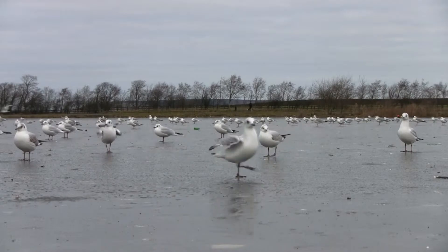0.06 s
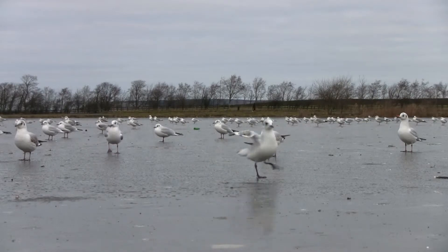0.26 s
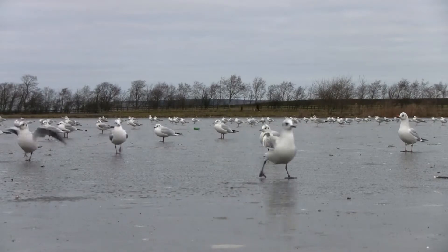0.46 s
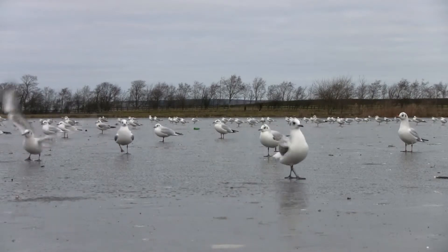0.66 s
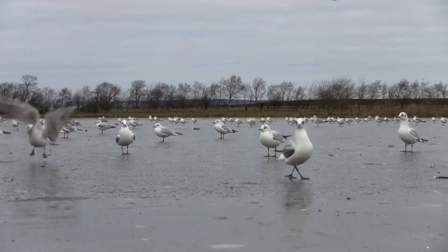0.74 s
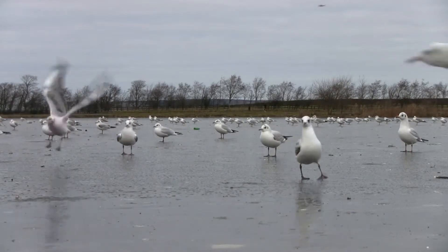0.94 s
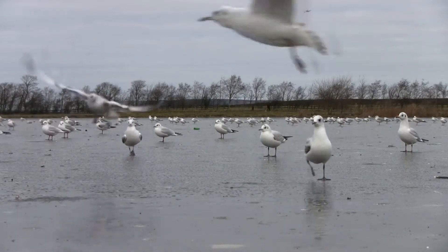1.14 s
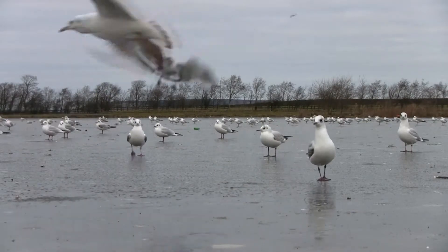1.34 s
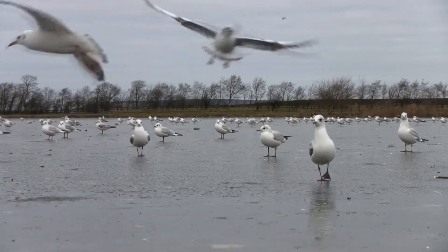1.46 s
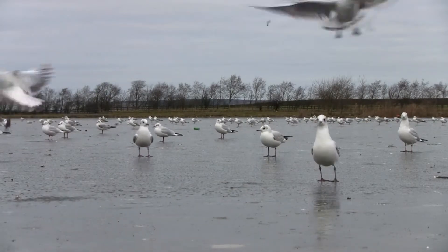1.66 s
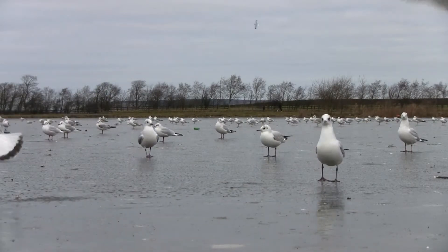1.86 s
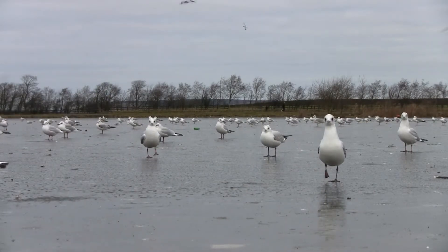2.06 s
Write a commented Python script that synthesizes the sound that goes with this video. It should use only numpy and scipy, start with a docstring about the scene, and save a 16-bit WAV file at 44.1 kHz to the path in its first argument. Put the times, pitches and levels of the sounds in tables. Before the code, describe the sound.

Gulls call close to the microphone on an icy lake: a trilled scream breaking downward, a harsh rattle, then a clear yelp stepping down, with fainter birds behind, distant flock murmur and low wind thumps.

```python
"""On a frozen lake, gulls close to a camera: a trilled scream that breaks downward, a harsh rattle, a clear
yelp that steps down; two more birds behind, and far croaks. Each voice is a stack of syrinx overtones plus
pulsed breath, coloured by a throat; ice and shore echo it. Wind noise and thumps buffet the two microphone
ports, filtered noise makes the murmur of the far flock and air, and a wavering sine makes a faint hum."""
import sys
import numpy as np
from scipy import signal
from scipy.fft import rfft, irfft, next_fast_len
from scipy.io import wavfile
from scipy.ndimage import uniform_filter1d, map_coordinates

SR = 44100
rng = np.random.default_rng(int(sys.argv[2]) if len(sys.argv) > 2 else 0)


def invert_db(x):
    """Field ratio 10**(x/20) for x, a level in decibels (scalar or array-like)."""
    u = np.asarray(x, float) / 20
    return 10 ** u


def wav_record(signal):
    """Record a signal, one row per channel, as 16-bit PCM in the file named by sys.argv[1]."""
    frames = np.transpose(np.atleast_2d(signal))
    bounded = np.clip(frames, -1, 1)
    # unit amplitude maps onto the largest positive 16-bit level
    quanta = np.round(bounded * 32767).astype(np.int16)
    wavfile.write(sys.argv[1], SR, quanta)


N = 92610  # 2.1 s


def unit(x):
    """Brings x to rms 1."""
    return x / np.sqrt(np.mean(x ** 2) + 1e-20)


def along(points, hz):
    """Reads (frequency [Hz], value) points on a log frequency axis."""
    f, v = np.transpose(points)
    return np.interp(np.log(hz + 1), np.log(f + 1), v)


def over_time(points, t):
    """Reads (time [s], value) points at the times t."""
    return np.interp(t, *np.transpose(points))


def wobble(rate, size=N):
    """A smooth random curve, rate knots a second."""
    knots = rng.standard_normal(int(size * rate / SR) + 4)
    return map_coordinates(knots, [np.arange(size) * rate / SR])


def coloured(x, spectrum):
    """x through a spectrum, brought to rms 1."""
    m = next_fast_len(len(x) + 4096)
    gains = invert_db(along(spectrum, np.fft.rfftfreq(m, 1 / SR)))
    return unit(irfft(rfft(x, m) * gains, m)[:len(x)])


def patchy(spectrum, patchy_db):
    """Coloured noise with time-frequency patches of random gain."""
    z = signal.stft(rng.standard_normal(N), nperseg=512)[2]
    field = uniform_filter1d(rng.standard_normal(z.shape), 5, 0)
    field = unit(uniform_filter1d(field, 5, 1))
    noise = signal.istft(z * invert_db(patchy_db * field), nperseg=512)[1][:N]
    return coloured(noise, spectrum)


# wind rumble before its lumps: (time [s], level [dB])
RUMBLE_LEVEL = [(0.0, -48), (0.02, -45.5), (0.1, -51.5), (0.21, -42), (0.34, -59), (0.87, -50),
                (0.92, -41.5), (1.03, -44), (1.51, -32), (1.77, -46), (2.03, -39.5), (2.1, -41.5)]
# rumble spectrum, alike at both ports: (frequency [Hz], relative level [dB])
RUMBLE_SPECTRUM = [(15, -84), (25, -43), (105, -2.5), (171, -1), (358, -10), (560, -16), (700, -39),
                   (910, -59), (1540, -120)]
# wind buffeting before its lumps: (time [s], level [dB])
BUFFET_LEVEL = [(0, -58), (.2, -46), (.34, -62), (.6, -57), (.87, -54.5), (1.0, -45.5), (1.2, -40),
                (1.3, -29.5), (1.48, -30), (1.6, -33), (1.75, -45.5), (1.9, -43), (2.1, -42.5)]
# buffeting spectrum, opposed at the two ports: (frequency [Hz], relative level [dB])
BUFFET_SPECTRUM = [(24, -79), (40, -42), (182, -17), (254, -16), (560, -32.5), (966, -54), (1500, -71),
                   (3300, -120)]
# eddies striking the ports: (time [s], envelope peak of the opposed part [dB])
THUMPS = [(1.125, -25), (1.216, -22.5), (1.26, -20), (1.337, -16.5), (1.384, -19.5), (1.421, -19.5),
          (1.498, -11), (1.621, -22.5), (1.953, -22), (2.023, -24.5)]
THUMP_HZ, THUMP_S, THUMP_MID_DB = 266, 0.0033, -9  # ring, envelope width, share alike at both ports


def wind():
    """Lumpy eddies: a rumble alike at both ports; buffeting and thumps push them mainly in opposition."""
    t = np.arange(N) / SR

    def lumpy(spectrum):
        lumps_db = 2 * wobble(49) + 0.96 * wobble(9.6)
        return coloured(rng.standard_normal(N) * invert_db(lumps_db), spectrum)

    thumps = np.zeros(N)
    for s, db in THUMPS:
        envelope = invert_db(db) * np.exp(-((t - s) / THUMP_S) ** 2)
        thumps += envelope * np.cos(2 * np.pi * THUMP_HZ * (t - s) + rng.normal(0, 0.83))
    mid = invert_db(over_time(RUMBLE_LEVEL, t)) * lumpy(RUMBLE_SPECTRUM) + invert_db(THUMP_MID_DB) * thumps
    side = invert_db(over_time(BUFFET_LEVEL, t)) * lumpy(BUFFET_SPECTRUM) + thumps
    return np.array([mid + side, mid - side])


# spectrum of far flock and air: (frequency [Hz], relative level [dB])
SHORE_SPECTRUM = [(210, -96), (350, -4.5), (574, -10.5), (631, -3), (1030, -5), (2450, -17), (4560, -35),
                  (6900, -34), (15800, -45.5)]
SHORE_DB, SHORE_WIDE_DB = -49, -10  # mean level; side part against mid part


def shore():
    """The murmur of the far flock and the air: patchy noise, wavering slightly in level."""
    mid = patchy(SHORE_SPECTRUM, patchy_db=3.0)
    side = invert_db(SHORE_WIDE_DB) * patchy(SHORE_SPECTRUM, patchy_db=2.0)
    return invert_db(SHORE_DB + 0.18 * wobble(9.6)) * np.array([mid + side, mid - side])


JITTER_RATE = 500  # pitch jitter, knots per second
BREATH_DB = 6.5  # breath gain, before roughness scales it
DULL_HZ = 3920  # a fading call loses its treble first, above this
SHADOW_HZ = 2500  # the camera body shades the far port above this


def at_ports(mono, pan_db, lag_us):
    """Positive pan lifts the left treble and cuts the right alike; positive lag reaches right first."""
    hz = np.fft.rfftfreq(N, 1 / SR)
    half_lag = np.exp(1j * np.pi * hz * lag_us / 10 ** 6)
    right = half_lag / invert_db(pan_db * hz / (hz + SHADOW_HZ))
    return irfft(rfft(mono) * [1 / right, right], N)


def gull(call, throat, gain_db=0., pan_db=0., lag_us=0., trill=None, depth=0., shut=.2, bend=0.,
         jitter_hz=122, restart=False, turn=.5, ramp=.3, early=0., steep=2., smear=.089, thin_db=0.,
         tilt_db=3, ground=((0, 0),)):
    """Jittered syrinx overtones plus breath pulsed by the same phase, through one throat.

    A flutter shuts the throat for a share of each beat; around the turn it can lift the pitch
    and thin the lowest overtone, and each beat can start the phase afresh. smear [rad] puts higher
    overtones out of step; tilt_db [dB per octave] makes breath brighter than the tone."""
    s, pitch, level_db, rough = np.transpose(call)
    first, last = int(s[0] * SR), int(s[-1] * SR)
    t = np.arange(first, last) / SR
    pitch, level_db = np.interp(t, s, pitch), np.interp(t, s, level_db)
    rough = np.interp(t, s, np.clip(rough, 0, 1))

    # throat flutter: beat is the position within each closure cycle, 0-1
    beat = .5 + 0 * t
    if trill:
        beat = np.interp(t, *np.transpose(trill), left=.5, right=.5) % 1
    from_closure = np.abs((beat + early + .5) % 1 - .5)
    gate = 1 - min(depth, 1) * np.exp(-(from_closure / shut) ** steep)
    lift = np.tanh((beat - turn) / ramp)

    bent = pitch * (1 + bend * (lift - lift.mean()) / 2)
    jitter = jitter_hz * rough * wobble(JITTER_RATE, size=len(t))
    phase = 2 * np.pi * np.cumsum(bent + jitter) / SR
    if restart:
        new_beat = np.diff(beat, prepend=0) < -.5
        phase = phase - np.maximum.accumulate(phase * new_beat)

    k = np.arange(1, int(15500 / pitch.min()) + 1)[:, None]  # overtone numbers
    gains = invert_db(along(throat, k * pitch)) * (k * pitch < 16000)
    gains[0] *= invert_db(over_time(ground, t) + thin_db * (1 + lift) / 2)
    overtones = gains * np.cos(k * phase + smear * k ** 2)
    tone = overtones.sum(0) / np.sqrt((gains ** 2).sum(0) / 2)

    breath_throat = [(hz, db + tilt_db * np.log2(hz / 4000)) for hz, db in throat]
    pulses = (1 + np.sin(phase)) ** 2
    breath = coloured(rng.standard_normal(len(t)) * pulses, breath_throat)
    voice = tone * np.sqrt(1 - rough ** 2) + rough * invert_db(BREATH_DB) * breath

    dull = signal.sosfilt(signal.butter(2, DULL_HZ, fs=SR, output='sos'), voice)
    voice = dull + (voice - dull) * invert_db(level_db - level_db.max())
    edge = np.clip(np.minimum(t - t[0], t[-1] - t) / .003, 0, 1)  # 3 ms fades
    out = np.zeros(N)
    out[first:last] = voice * gate * edge * invert_db(level_db + gain_db)
    return at_ports(out, pan_db, lag_us)


# far croaks: (start [s], length [s], peak level [dB], pitch [Hz])
CROAKS = [(.17, 0.071, -47, 1366), (1.091, 0.12, -46, 788), (1.161, 0.087, -48, 598.5),
          (1.901, 0.18, -50, 955)]
# throat of the far birds: (frequency [Hz], relative gain [dB])
FAR_THROAT = [(500, -55), (1200, -5), (2200, -2), (3100, -9.5), (4500, -24.5), (7000, -41), (12000, -67)]
CROAK_ROUGH, CROAK_SAG, CROAK_TRILL_HZ = 0.57, 0.073, 98.8  # 0-1, share of pitch, closures per second


def croaks():
    """Short rough calls of far birds, swelling in level, then sagging in pitch."""
    birds = np.zeros((2, N))
    for s, length, db, hz in CROAKS:
        call = [(s, hz, db - 14, CROAK_ROUGH),
                (s + .3 * length, hz, db, CROAK_ROUGH),
                (s + length, hz * (1 - CROAK_SAG), db - 10, CROAK_ROUGH)]
        trill = [(s, 0), (s + length, length * CROAK_TRILL_HZ)]
        birds += gull(call, FAR_THROAT, trill=trill, depth=0.31, shut=0.077)
    return birds


# echo decay off ice and shore: (frequency [Hz], time to fall 60 dB [s])
ICE_DECAY = [(300, 0.3), (2500, 0.38), (6000, 0.34), (9000, 0.13), (15000, 0.39)]


def echoes(x):
    """Ice and shore answer with a noise tail; each frequency dies at its own speed."""
    hz, t, z = signal.stft(rng.standard_normal((2, SR // 3)), SR, nperseg=256)
    decay_db = -60 * t / along(ICE_DECAY, hz)[:, None]
    tail = signal.istft(z * invert_db(decay_db), SR, nperseg=256)[1]
    return signal.fftconvolve(x, tail / np.linalg.norm(tail[0]), axes=1)[:, :N]


# scream of the near gull: (time [s], pitch [Hz], level before gain [dB], roughness [0-1])
SCREAM = [(.236, 786, -23.5, .4), (.244, 889, -34.5, .2), (.247, 933, -22, .1), (.275, 1033, -21.5, .12),
          (.293, 1111, -21, .2), (.335, 1161, -22.5, .25), (.387, 1115, -22.5, .24), (.415, 1128, -23, .2),
          (.437, 1088, -21, .15), (.517, 1030, -22, .15), (.561, 1029, -22.5, .17), (.583, 1018, -21, .13),
          (.607, 935.5, -22.5, .08), (.615, 897, -26.5, .1)]
# its throat flutter: (time [s], closures so far [count])
SCREAM_TRILL = [(.2725, -1), (.3123, 3), (.347, 7), (.4204, 15), (.4908, 22), (.502, 23), (.5958, 30),
                (.61, 31)]
# its throat: (frequency [Hz], relative gain [dB])
SCREAM_THROAT = [(400, -35), (1100, -22), (1600, -16.5), (2150, 2.5), (2700, -12), (3200, -19.5),
                 (3700, -34.5), (4200, -20.5), (5200, -16), (6300, -16), (7100, -24.5), (9000, -36),
                 (15000, -47.5)]


def scream():
    """The trilled scream: flutter nearly shuts the throat and lifts the pitch within each beat."""
    return gull(SCREAM, SCREAM_THROAT, 0.39, -1.8, 21.0, SCREAM_TRILL, depth=0.99, shut=0.073,
                bend=0.086, jitter_hz=117, turn=0.11, ramp=0.37)


# the scream's downward break: (time [s], pitch [Hz], level before gain [dB], roughness [0-1])
BREAK = [(.614, 719, -25.5, .14), (.628, 727, -25.5, .1), (.638, 692, -26, .08), (.676, 704.6, -27, .12),
         (.702, 556, -27, 0.12), (.722, 562, -30, 0.1), (.745, 494.6, -31.5, 0.078),
         (.765, 438, -38, 0.087), (.79, 401, -36, 0.19)]
# throat during the break: (frequency [Hz], relative gain [dB])
BREAK_THROAT = [(350, -9.5), (700, -15.5), (1400, -5), (2100, 1.5), (2800, -13), (3500, -27), (4200, -11),
                (4900, -19.5), (7000, -20.5), (8500, -43), (15000, -39)]


def scream_break():
    """The scream drops to a lower, untrilled voice that slides down."""
    return gull(BREAK, BREAK_THROAT, 0.23, -3.0, 28)


# a faint hum: (start [s], end [s], mean frequency [Hz], mean level [dB])
HUM = (.62, .95, 240, -50)


def hum():
    """A faint low sine, slightly wavering in pitch and level, alike at both ports."""
    start, end, hz, db = HUM
    t = np.arange(N) / SR
    edge = np.clip(np.minimum(t - start, end - t) / 0.013, 0, 1)
    level = invert_db(db + 1.1 * wobble(8.7))
    return level * edge * np.sin(2 * np.pi * np.cumsum(hz + 4 * wobble(8.83)) / SR)


# harsh rattle: (time [s], pitch [Hz], level before gain [dB], roughness [0-1])
RATTLE = [(.68, 970, -42, .35), (.7, 950, -30.5, .32), (.726, 935, -26, .28), (.844, 935, -26, .28),
          (.944, 922, -27, .28), (1.0, 875, -28.5, .3), (1.056, 800, -30.5, .28), (1.105, 735, -40.5, .3)]
# its throat flutter: (time [s], closures so far [count])
RATTLE_TRILL = [(.6802, 0), (.7022, 2), (.7567, 7), (.8694, 17), (.9846, 27), (1.0344, 31), (1.088, 35),
                (1.102, 36)]
# its throat: (frequency [Hz], relative gain [dB])
RATTLE_THROAT = [(350, -70), (600, -5.5), (900, -8.5), (1400, -6.5), (1870, -11.5), (2340, -7),
                 (2850, -6.5), (3750, -0.5), (5110, -13.5), (5600, -10.5), (15000, -47)]
# throat colour of the other half of the syrinx: (frequency [Hz], relative gain [dB])
SECOND_THROAT = [(500, -32), (1040, -13), (2100, -7.5), (3100, -1), (4200, -7), (12000, -52)]
SECOND_RATIO = 1.11  # the other half sounds this much higher


def rattle():
    """Flutter restarts the tone each beat; the other half of the syrinx joins late in each beat."""
    first = gull(RATTLE, RATTLE_THROAT, 1.6, -0.037, -24, RATTLE_TRILL, depth=0.91, shut=0.24,
                 bend=0.028, jitter_hz=58.3, restart=True, turn=0.46, ramp=0.085, early=0.053,
                 steep=4.3, smear=0.062, thin_db=-12.5)
    higher = [(s, hz * SECOND_RATIO, db, rough) for s, hz, db, rough in RATTLE]
    second = gull(higher, SECOND_THROAT, -1.4, 0, -10, RATTLE_TRILL, depth=0.74, shut=0.28,
                  jitter_hz=55, early=-0.13, steep=8.1, restart=True)
    return first + second


# rough start of the yelp: (time [s], pitch [Hz], level before gain [dB], roughness [0-1])
YELP_START = [(1.389, 912, -44, 0.34), (1.393, 932, -35.5, 0.45), (1.403, 1002, -32.5, 0.56),
              (1.406, 1223, -31, 0.08), (1.426, 1472, -26, 0.34), (1.431, 1700, -49, .4)]
# throat at the start: (frequency [Hz], relative gain [dB])
START_THROAT = [(600, -23), (1300, 1.5), (1900, 11), (2800, -12), (4200, -17), (5500, -7), (7000, -4),
                (9000, -27.5), (15000, -28)]


def yelp_start():
    """The yelp opens with a rough voice sweeping upward."""
    return gull(YELP_START, START_THROAT, 0.11, -0.5, 10)


# clear yelp: (time [s], pitch [Hz], level before gain [dB], roughness [0-1])
YELP = [(1.426, 1866, -27.5, 0.12), (1.434, 1816, -26.5, 0.1), (1.438, 1884, -24.5, 0.39),
        (1.443, 1911, -24.5, 0.13), (1.47, 1920, -23, 0.02), (1.495, 1859, -25.5, 0.043),
        (1.512, 1795, -28.5, 0.31), (1.524, 1782, -26, 0.13), (1.548, 1767, -25, 0.098),
        (1.565, 1708, -25, 0.041), (1.6, 1719, -25, 0.14), (1.634, 1653, -27, 0.16),
        (1.643, 1632, -24.5, 0.13), (1.648, 1368, -29, 0.13), (1.687, 1283, -28.5, 0.14),
        (1.706, 1350, -31, 0.06), (1.73, 1291, -33, 0.12), (1.745, 1140, -35.5, 0.16),
        (1.762, 973, -36, 0.28)]
# its throat: (frequency [Hz], relative gain [dB])
YELP_THROAT = [(300, -1), (900, 1), (1400, 12.5), (3500, -0.5), (5400, 4), (7400, -1), (8500, -12),
               (11500, -18.5), (13000, -35)]
# the lowest overtone wavers: (time [s], gain [dB])
YELP_GROUND = [(1.442, -14.5), (1.45, -3), (1.49, -5.5), (1.51, -14.5), (1.6, -12), (1.632, -21),
               (1.645, -4.5)]


def yelp():
    """A clear tone that steps down in pitch while its lowest overtone wavers."""
    return gull(YELP, YELP_THROAT, 0.078, -1.3, 6.7, tilt_db=6.5, ground=YELP_GROUND)


# whine of a bird behind: (time [s], pitch [Hz], level before gain [dB], roughness [0-1])
WHINE = [(1.53, 1110, -46, .1), (1.542, 1162, -35, .05), (1.58, 1166, -33, .05), (1.62, 1119, -33, .07),
         (1.646, 1111, -37, .15), (1.706, 1120, -31.5, 0.2), (1.728, 1111, -33, 0.2),
         (1.772, 1095, -32.5, 0.15), (1.782, 1075, -38, 0.14)]
# its throat flutter: (time [s], closures so far [count])
WHINE_TRILL = [(1.649, -3), (1.774, 9)]


def whine():
    """A bird behind whines through a throat like the scream's; its later part flutters."""
    return gull(WHINE, SCREAM_THROAT, 0.3, 0.16, -53, WHINE_TRILL, depth=0.83, shut=0.21)


# low end of the yelp: (time [s], pitch [Hz], level before gain [dB], roughness [0-1])
YELP_END = [(1.74, 880, -52, .2), (1.76, 880, -46, .15), (1.774, 860, -39, .12), (1.787, 820, -38, .1),
            (1.792, 485, -36, .12), (1.802, 465, -35, .12), (1.812, 400, -38, .15), (1.83, 370, -39, .18),
            (1.862, 330, -54, .3)]
# throat at the end: (frequency [Hz], relative gain [dB])
END_THROAT = [(300, -1), (800, -11), (1500, 2.5), (2200, -28), (4200, -10), (6500, -51), (8000, -42),
              (15000, -43)]


def yelp_end():
    """The yelp ends in a low voice that drops abruptly in pitch."""
    return gull(YELP_END, END_THROAT, 0.51, -3.1, 21.3)


# falling call of a bird behind: (time [s], pitch [Hz], level before gain [dB], roughness [0-1])
SLIDE = [(1.785, 1593, -36.5, 0.12), (1.803, 1555, -41, 0.25), (1.841, 1527, -46, 0.11),
         (1.861, 1329, -51.5, 0.15), (1.903, 1119, -43, 0.11), (1.937, 1020, -42.5, 0.18),
         (1.96, 970, -47, 0.13)]
# its throat: (frequency [Hz], relative gain [dB])
SLIDE_THROAT = [(900, -3), (1550, -4.5), (2200, 12), (3100, -7), (4600, -17), (6500, -13.5), (12000, -47)]


def slide():
    """Another bird behind slides down in pitch."""
    return gull(SLIDE, SLIDE_THROAT, 0.72, 0.38, 49)


def scene():
    """All birds with their echoes over the lake, in wind, murmur and hum."""
    birds = croaks() + scream() + scream_break() + rattle()
    birds = birds + yelp_start() + yelp() + whine() + yelp_end() + slide()
    return birds + invert_db(-13.5) * echoes(birds) + wind() + shore() + hum()


def low_pass(x):
    """Removes everything above the highest recorded frequency."""
    return signal.sosfilt(signal.butter(12, 15850, fs=SR, output="sos"), x)


def record(dry):
    """The finished mix as the camera keeps it."""
    return low_pass(dry)


dry = scene()
out = record(dry)
wav_record(out)
```